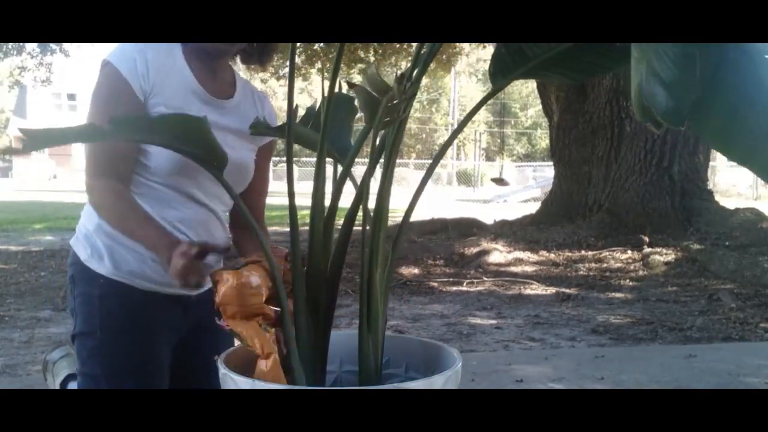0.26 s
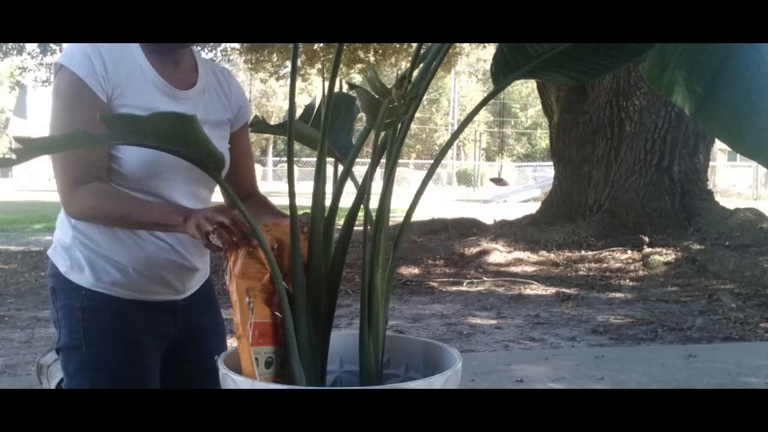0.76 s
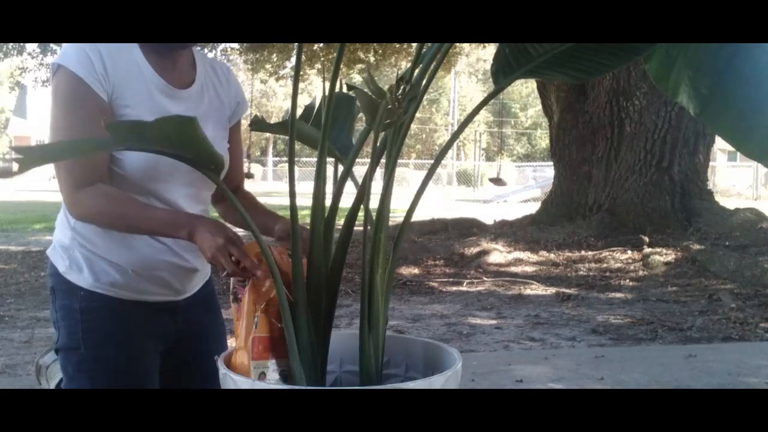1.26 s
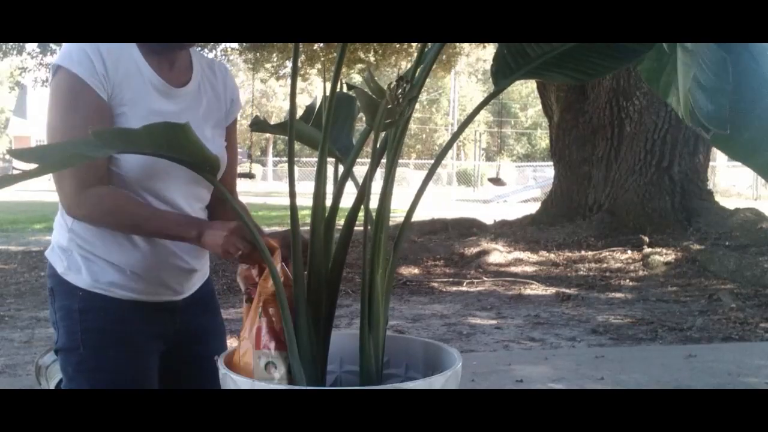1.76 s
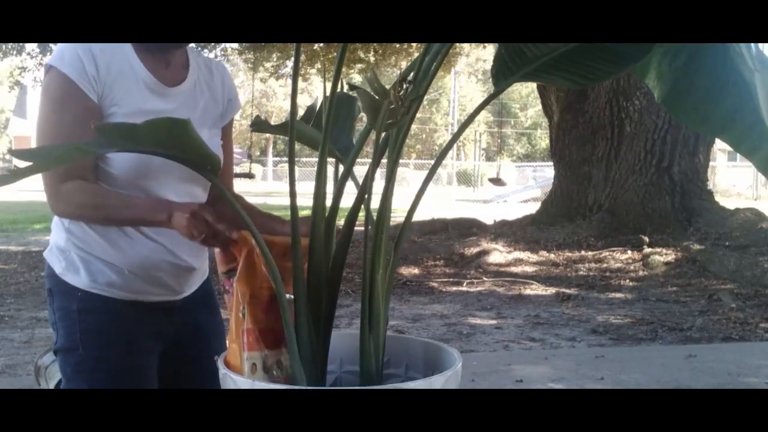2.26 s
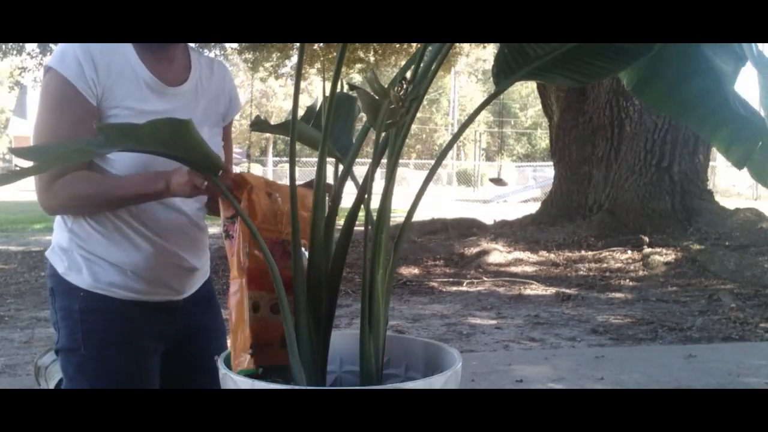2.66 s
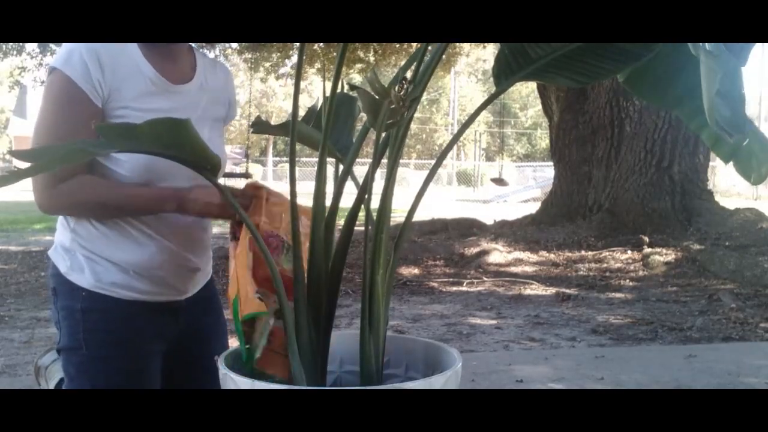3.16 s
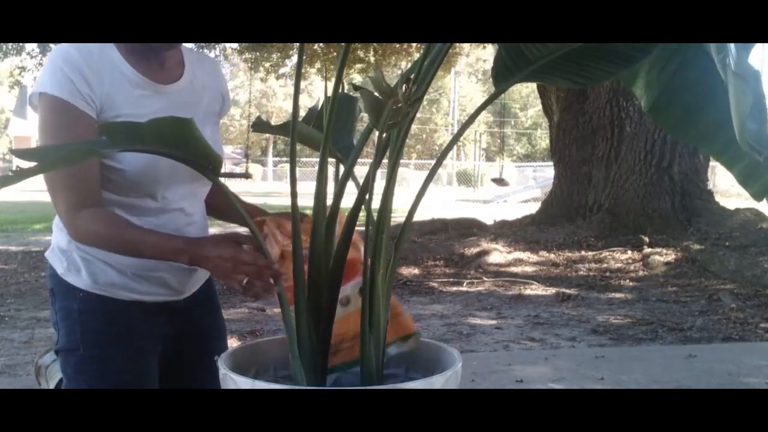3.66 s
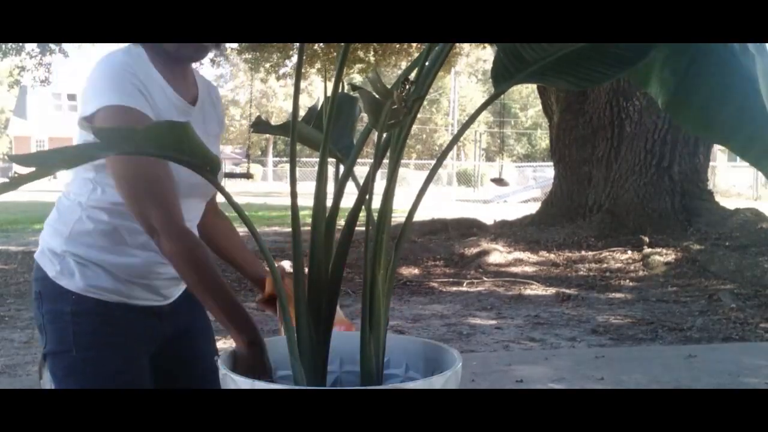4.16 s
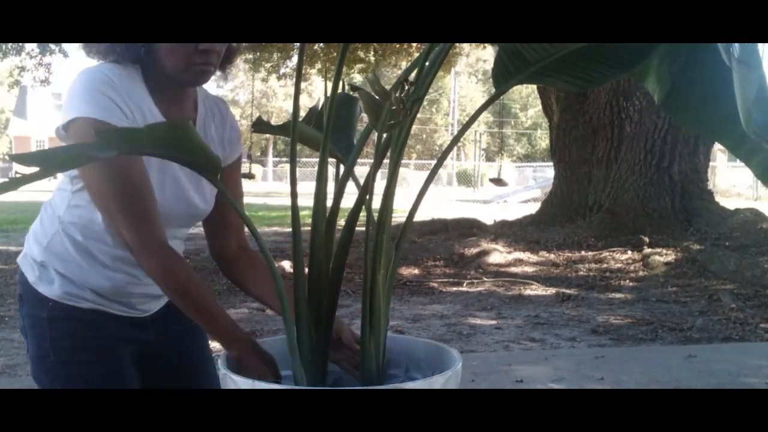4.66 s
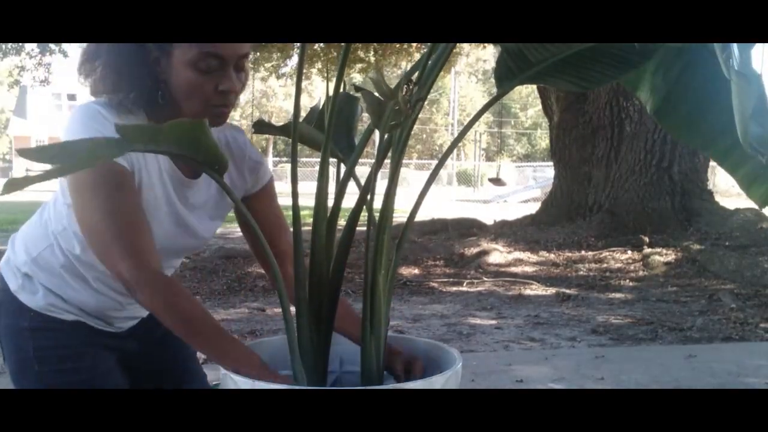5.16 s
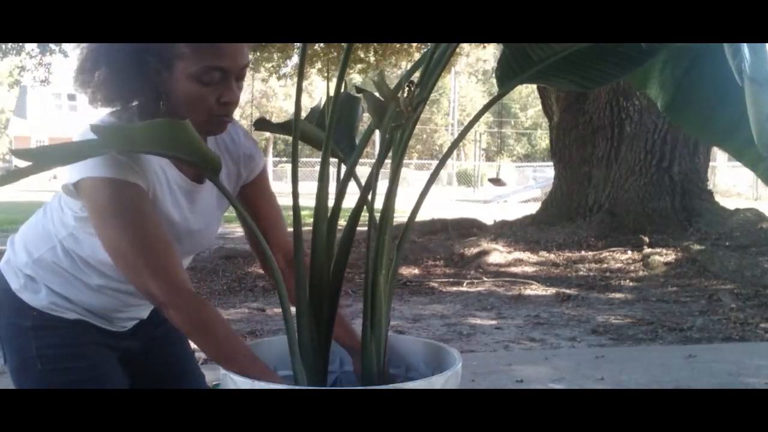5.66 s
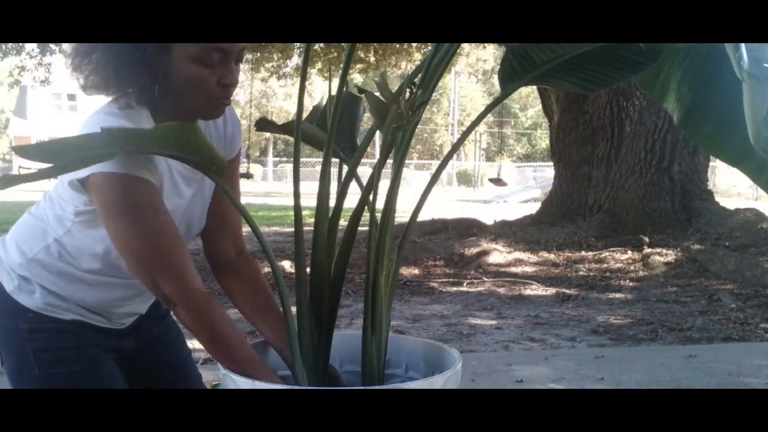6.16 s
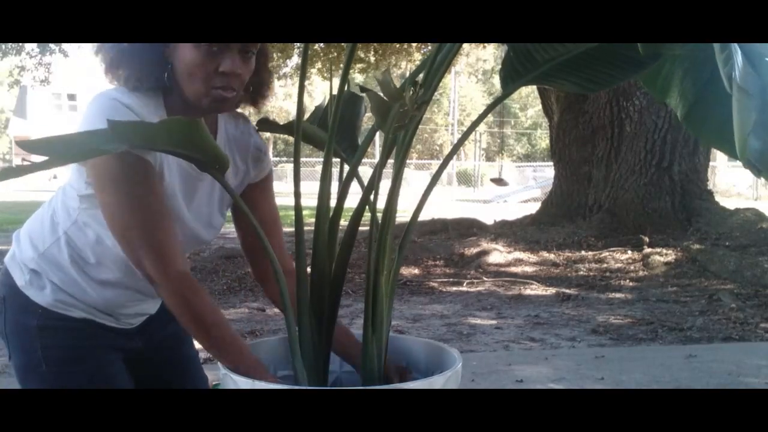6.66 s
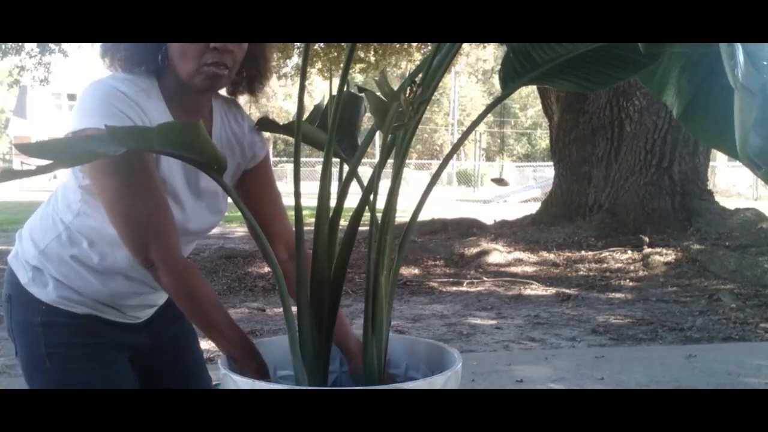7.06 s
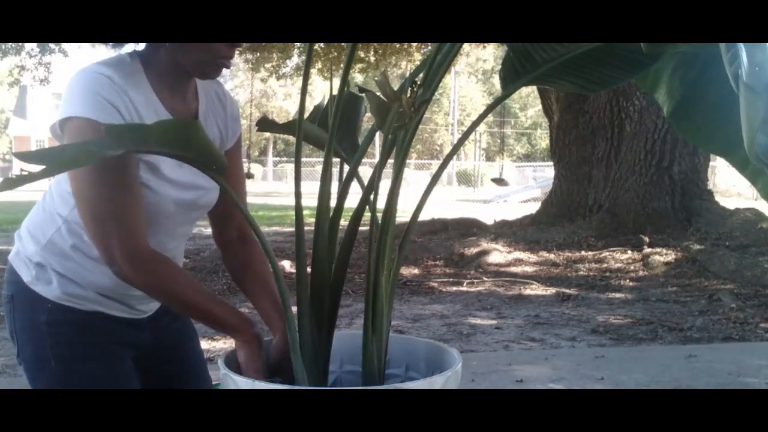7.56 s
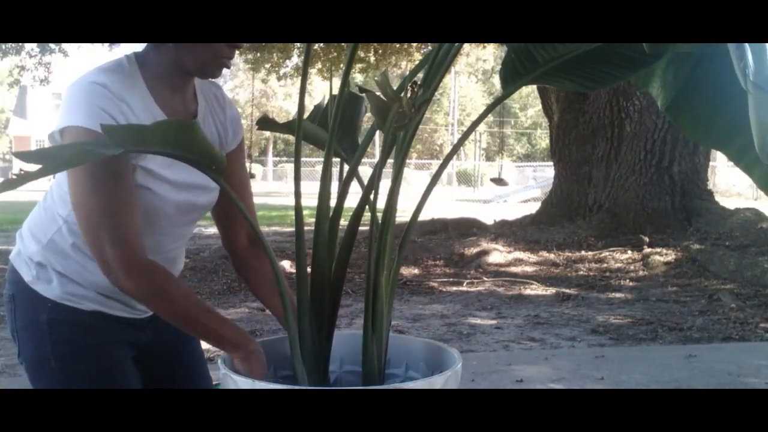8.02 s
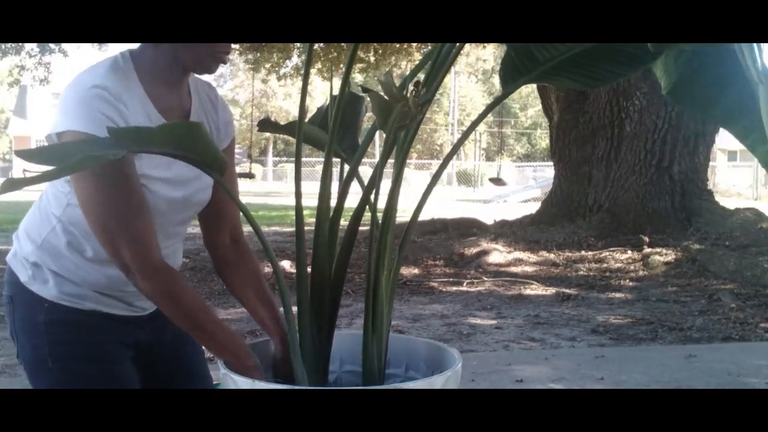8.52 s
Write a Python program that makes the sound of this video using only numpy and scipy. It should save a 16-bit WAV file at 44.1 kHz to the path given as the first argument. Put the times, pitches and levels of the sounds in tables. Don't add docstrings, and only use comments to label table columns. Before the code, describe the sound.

Close outdoors, a stiff plastic bag crinkles and snaps sharply as it is gathered and shaken, loudest around two seconds, with soil sliding and clods thudding on a planter. It flaps empty, falls with a last crackle and a hard thump. Then only faint gritty ticks of hands in soil remain over low traffic hum and wind buffeting the stereo microphone.

```python
import sys
import numpy as np
from scipy import signal
from scipy.fft import rfft, irfft
from scipy.io import wavfile
from scipy.ndimage import uniform_filter1d

SR = 44100
rng = np.random.default_rng(int(sys.argv[2]) if len(sys.argv) > 2 else 0)


def wrap_up_sound(samples):
    columns = np.atleast_2d(samples).T
    tamed = np.clip(columns, -1, 1)
    steps = np.round(tamed * 32767).astype(np.int16)
    wavfile.write(sys.argv[1], SR, steps)


def gain_from_decibels(decibels):
    exponent = np.asarray(decibels, float) / 20
    return 10 ** exponent


N = 387638


def evened(x):
    return x / np.sqrt(np.mean(x ** 2) + 1e-20)


def read(points, hz):
    f, value = np.transpose(points)
    return np.interp(np.log(hz + 1), np.log(f + 1), value)


def add(mix, s, sound):
    part = mix[..., max(round(s * SR), 0):][..., :sound.shape[-1]]
    part += sound[..., :part.shape[-1]]


def causal(gain_db):
    cepstrum = irfft(np.maximum(gain_db, -100) * np.log(10) / 20)
    cepstrum[1:2048] *= 2
    cepstrum[2049:] = 0
    return irfft(np.exp(rfft(cepstrum)))[:2048]


def resonate(x, hz, width):
    return signal.lfilter(*signal.iirpeak(hz, hz / width, SR), x)


def ring(x, hz, width):
    turn = np.exp(2j * np.pi * np.cumsum(hz) / SR)
    r = np.exp(-np.pi * width / SR)
    return 2 * (turn * signal.lfilter([1 - r], [1, -r], x / turn)).real


def noise(colour, same, swell_db, patchy_db, size=2048):
    frames, hz = 4 * N // size + 5, np.fft.rfftfreq(size, 1 / SR)
    a, b, c, d, patches = rng.standard_normal((frames, len(hz), 5)).T
    swell = evened(uniform_filter1d(patches[0], size=12))
    patches = uniform_filter1d(patches, size=8, axis=0)
    patches = evened(uniform_filter1d(patches, size=8, axis=1))
    same = np.clip(same(hz), -1, 1)[:, None]
    left = a + 1j * b
    right = same * left + np.sqrt(1 - same ** 2) * (c + 1j * d)
    drift_db = (patchy_db * patches + swell_db * swell) / (1 + hz[:, None] / 2500)
    z = np.array([left, right]) * gain_from_decibels(read(colour, hz)[:, None] + drift_db)
    return evened(signal.istft(z, nperseg=size, noverlap=3 * size // 4)[1][:, :N])


def yard():
    # pitch in Hz, level in dB per Hz.
    hum_colour = [(26, -42.5), (45, 0), (85, -12.5), (114, -3), (162, -6), (245, -16.5), (271, -21),
                  (442, -26.5), (838, -32), (948, -34.5), (1050, -38.5), (1440, -49.5), (4920, -64),
                  (7650, -69), (16000, -100.5)]
    # pitch in Hz, likeness of left and right from -1 to 1.
    hum_likeness = [(60, 0.93), (180, 0.94), (550, 0.55), (1650, -0.32), (4970, 0.16), (15000, -0.928)]
    # pitch in Hz, width in Hz.
    machine_lines = [(67.8, 16), (1030, 40), (1980, 40), (2080, 210), (5700, 200), (7620, 260)]
    machine_levels = [-41.5, -70.5, -85.5, -82, -94.5, -97.5]
    out = gain_from_decibels(-34.5) * noise(hum_colour, lambda hz: read(hum_likeness, hz), swell_db=2.0, patchy_db=0.5)
    hiss = rng.standard_normal(N)
    for (hz, width), db in zip(machine_lines, machine_levels):
        line = resonate(resonate(hiss, hz, width), hz, width)
        out = out + gain_from_decibels(db) * evened(line)
    return out


def wind():
    # time in seconds, level in dB.
    gust_curve = [(0.0, -63), (0.12, -37), (0.78, -51.5), (3.06, -39.5), (3.67, -26.5), (3.771, -34),
                  (4.8, -34.5), (4.819, -35.5), (5.24, -29), (5.29, -37), (6.0, -31), (6.76, -39),
                  (7.44, -30), (7.54, -46.5), (8.22, -35.5), (8.32, -53), (8.54, -35), (8.79, -63.5)]
    # pitch in Hz, level in dB per Hz.
    gust_colour = [(8, -10.5), (20, 11), (45, 9.5), (90, -13.5), (200, -15), (500, -81.5)]
    s, db = np.transpose(gust_curve)
    gusts = noise(gust_colour, lambda hz: 0.05 + 0 * hz, swell_db=2.5, patchy_db=3.0)
    gusts /= np.sqrt(uniform_filter1d(gusts ** 2, size=16000, axis=1))
    return gusts * gain_from_decibels(np.interp(np.arange(N) / SR, s, db) + 3.5) * gain_from_decibels([[-1.5], [1.5]])


def rustle_levels(t):
    # time in seconds, level in dB.
    shaking = [(0.0, -52), (0.62, -45), (0.89, -45.5), (1.07, -38), (1.2, -44.5), (1.45, -37.5),
               (1.59, -44.5), (1.76, -36.5), (2.0, -51), (2.03, -44.5), (2.24, -47), (2.53, -36),
               (2.6, -47), (2.81, -47.5), (2.99, -40.5), (3.15, -48), (3.31, -41.5), (3.42, -51.5)]
    # time in seconds, level in dB.
    falling = [(3.54, -42.5), (3.67, -36), (3.72, -41.5), (3.77, -36.5), (3.8, -45), (3.82, -33.5),
               (3.86, -42.5), (3.93, -50.5), (3.96, -81)]
    # time in seconds, level in dB.
    settling = [(4.05, -80), (4.21, -77), (4.24, -55), (4.35, -50), (4.38, -34.5), (4.42, -64), (4.49, -61),
                (4.53, -85), (4.72, -74.5)]
    # middle in seconds,
    # length in seconds, level in dB, bright share in dB, boomy share in dB.
    slides = [(0.951, 0.13, -36.5, -8, 1), (1.663, 0.041, -34.5, -12, 0), (1.879, 0.11, -36, -13, -0.5),
              (1.966, 0.12, -31.5, -11, 0.5), (2.099, 0.068, -29, -10, 4), (2.165, 0.2, -32.5, -8, -3),
              (2.287, 0.038, -24, -23, -4.5), (2.342, 0.24, -39, -9.5, 1.5), (2.915, 0.046, -48, -27, -2),
              (3.26, 0.1, -50, -25, 11), (3.342, 0.02, -39.5, -18, 13), (3.74, 0.063, -41, -4, 1),
              (4.108, 0.16, -75, -7, -4), (5.415, 0.029, -74, 0, -3), (5.887, 0.029, -59.5, -18.5, 17),
              (6.25, 0.075, -56, -2.5, 7.5), (6.348, 0.04, -73.5, -26.5, 27.5),
              (7.975, 0.016, -62.5, -12, 9), (8.473, 0.049, -65.5, -18.5, 17), (4.436, 0.16, -48.5, -7, 9),
              (4.567, 0.039, -62.5, -10.5, 8), (4.765, 0.054, -70.5, -17.5, 19),
              (4.652, 0.046, -68.5, -14.5, 18)]
    s, db = np.transpose(list(shaking) + list(falling) + list(settling))
    effort_db = np.interp(t, s, db, right=-130)
    strong_db = np.maximum(effort_db + 40.5, -5)
    boomy = -1.5 - 0.16 * strong_db
    bright = -8 - t - 0.63 * strong_db
    levels = gain_from_decibels(effort_db + np.array([boomy, 0 * t, bright]))
    for s, length, db, bright_db, boomy_db in slides:
        swell = np.hanning(round(length * SR))
        add(levels, s - length / 2, gain_from_decibels(db + np.array([[boomy_db], [0], [bright_db]])) * swell)
    return levels


def folds():
    # start in seconds, peak in dB, bright share in dB, time to fade by 60 dB in seconds.
    gathering = [(0.1268, -24, -6, 0.025), (0.1396, -17, -8, 0.026), (0.184, -20.5, -16, 0.022),
                 (0.2426, -22, -14, 0.034), (0.2633, -20, -16, 0.024), (0.3198, -25, -7, 0.06),
                 (0.4112, -25.5, 2.5, 0.052), (0.4217, -23.5, -20, 0.066), (0.5256, -14.5, -5, 0.022),
                 (0.5895, -19.5, -12.5, 0.043), (0.618, -42, 9, 0.014), (0.6953, -24.5, -28, 0.048),
                 (0.753, -26, -20, 0.038), (0.861, -25, -20, 0.15), (0.9043, -38, -10, 0.02),
                 (0.922, -18, -20, 0.021), (0.945, -16.5, -15, 0.039), (0.9774, -17, -11, 0.07),
                 (0.9976, -21, -8, 0.028), (1.0644, -28, -8, 0.17), (1.1, -24, -9.5, 0.1),
                 (1.1724, -24.5, -12.5, 0.18), (1.1952, -19, -18, 0.078)]
    hard_shakes = [(1.371, -14, -14, 0.045), (1.3938, -16, -9, 0.032), (1.4294, -9.5, -25.5, 0.016),
                   (1.4407, -5, -10.5, 0.018), (1.4587, -17, -10.5, 0.1), (1.51, -24, -2, 0.0082),
                   (1.54, -15.5, -13, 0.02), (1.579, -18, -21, 0.084), (1.641, -33, -19, 0.044),
                   (1.6653, -19.5, -22, 0.095), (1.7205, -8.5, -13, 0.017), (1.7315, -8, -13.5, 0.04),
                   (1.744, -16.5, -14, 0.15), (1.7851, -20.5, -6.5, 0.038), (1.8774, -14, -19, 0.027),
                   (1.8845, -6, -17.5, 0.097), (1.9255, -17.5, -13, 0.21), (1.937, -19.5, -3, 0.038),
                   (1.989, -19, -12.5, 0.06), (2.0777, -8, -18.5, 0.029), (2.0929, -4.5, -13.5, 0.07),
                   (2.147, -4, -13, 0.033), (2.2202, -11, -10.5, 0.021), (2.254, -18, -9, 0.055),
                   (2.2905, -6.5, -12, 0.071), (2.2935, -26, -1, 0.03), (2.378, -24.5, -4, 0.034),
                   (2.397, -11.5, -11.5, 0.038), (2.4217, -17.5, -20.5, 0.031), (2.5032, -15, -21, 0.17),
                   (2.5235, -8, -14.5, 0.03)]
    empty_flaps = [(2.7724, -26.5, -25, 0.1), (2.798, -19, -23, 0.069), (2.866, -26.5, -12, 0.015),
                   (2.8982, -26, -10.5, 0.034), (2.9264, -26, -33, 0.15), (3.0924, -23.5, -34, 0.055),
                   (3.1365, -18, -19, 0.2), (3.1432, -17, -15, 0.019), (3.1688, -18, -15.5, 0.062),
                   (3.235, -19.5, -28, 0.066), (3.2574, -26, -18, 0.19), (3.3088, -30, -26, 0.046),
                   (3.3414, -31.5, -20, 0.061), (3.462, -24, -16, 0.015), (3.49, -14.5, -17, 0.023),
                   (3.5306, -21.5, -17, 0.091), (3.5728, -27, -8, 0.04), (3.5866, -8.5, -16, 0.026),
                   (3.6295, -29.5, 2, 0.12), (3.6614, -29, -7, 0.056), (3.7243, -22, -15, 0.03),
                   (3.7405, -8, -13.5, 0.046), (3.817, -15.5, -14.5, 0.029), (3.9962, -37.5, -15, 0.035),
                   (4.3545, -21, -20, 0.12), (4.3652, -26, -10, 0.044)]
    # start in seconds, peak in dB,
    # bright share in dB, boomy share in dB.
    crumbs = [(3.9627, -42.5, -13, 1), (4.085, -40.5, -20, 0), (4.12, -34, -21, 4), (4.1344, -48, -8.5, 5),
              (4.555, -48, -16, -2), (4.578, -55, -13, 11.5), (4.622, -48, -11, 3),
              (4.658, -50, -22.5, 16.5), (4.76, -54, -25, 10), (4.7724, -61, -18, 5.5),
              (5.385, -60.5, -2, 6.5), (5.4182, -55.5, -5.5, 2), (5.613, -63.5, 2, 7),
              (5.789, -53.5, -16.5, 16), (5.878, -40, -27, 2), (5.8956, -52, -17, -3),
              (5.9446, -61, -9, 11), (6.0432, -65.5, -4, 3), (6.222, -57.5, -9, 8),
              (6.243, -53.5, -12.5, 9.5), (6.6746, -59.5, -12, 10), (7.215, -53, -8, -2.5),
              (7.2337, -61, -8, 5.5), (7.9535, -53.5, -22.5, 11.5), (7.9693, -43, -20.5, -0.5),
              (8.3195, -56, -22, 12), (8.4643, -46.5, -22, -0.5), (8.475, -57, -19.5, 6.5),
              (8.655, -59.5, -2, 0), (8.672, -65, 0.5, -0.5)]
    # start in seconds, peak in dB, bright and boomy shares in dB.
    ticks = [(0.052, -29, -9, -13), (0.064, -30, -13, -15), (0.2183, -27.5, -10.5, -12),
             (0.277, -31, -25, 6), (0.4664, -28, -4.5, -10), (0.7127, -31.5, -10, 2),
             (1.406, -26, -8, -17.5), (1.477, -21, -10, -6), (1.748, -23, -14.5, -12),
             (1.896, -10.5, -21, -3.5), (2.0488, -38, -18, -8), (2.064, -20.5, -19, -4),
             (2.107, -3.5, -13.5, -8), (2.1983, -17, -7, -20), (2.279, -15, -25, -14), (2.299, 0, -26, -15),
             (2.432, -27, -10, -14), (2.651, -36, -10, -6), (2.725, -47, -14, -6), (2.844, -32, -4, -9),
             (3.031, -29, -22, 0.5), (3.127, -26, -25, 5), (3.425, -30, -20, -6), (3.446, -26, -20, -3),
             (3.522, -36, -12, 3), (3.559, -30, 0, -12), (3.751, -30, -19, -29), (3.83, -23, -14, -2),
             (3.9151, -31, -8, 1), (3.93, -42, -11, -12), (4.056, -56, -13, -2), (4.2421, -53, -26, -6),
             (4.2531, -39, -24, -2), (4.3238, -39, -21, 8), (4.378, -29, -8, -8), (4.4102, -28.5, -9, 3),
             (4.431, -42, -14, 5), (4.475, -44, -11, -2), (4.505, -50.5, -22, 18), (4.5634, -54.5, -3, 0),
             (5.418, -55.5, -6, -2.5), (5.6134, -62, -6, -3.5), (6.6747, -61.5, -6.5, 1),
             (7.217, -60.5, -10, -5), (7.9686, -52.5, -17, 0), (8.4667, -47.5, -17.5, 2.5),
             (0.668, -39, -8, -8), (1.086, -24, -11, -5), (3.247, -25, -18, 7), (3.699, -30, -8, -5)]
    s, db, bright_db, t60 = np.transpose(list(gathering) + list(hard_shakes) + list(empty_flaps))
    t60 = np.clip(t60, .008, .15)
    chance = rng.random(len(s))
    boomy_db = -13 + 12 * np.log2(t60 / 0.081) - 2.5 * (db + 16.0)
    boomy_db = np.minimum(boomy_db, -6)
    ring_hz = 1000 * 2 ** (1.9 * chance ** 2)
    bag = np.transpose([s, db, bright_db, boomy_db, t60, ring_hz, np.ones(len(s))])
    soil = [(*row, 0.031, 1750, .15) for row in crumbs]
    small = [(*row, 0.021, 2400, 1) for row in ticks]
    rows = np.vstack([bag, np.array(soil + small)])
    return rows[np.argsort(rows[:, 0])]


def buckles(per_s, clump_db, starts, count=10):
    size = gain_from_decibels(.6 * np.minimum(rng.exponential(1, N), 4.5)) * rng.choice([-1, 1], N)
    clumps = gain_from_decibels(clump_db * evened(uniform_filter1d(rng.standard_normal(N), size=300)))
    size = evened(size * (rng.random(N) < clumps * per_s / SR))
    size[(starts * SR).astype(int)] = 8
    patch, out = rng.integers(0, count, N), np.zeros((2, N))
    for k, (pitch, side) in enumerate(rng.random((count, 2))):
        clicks = size * (patch == k)
        clicks = clicks + 0.04 * resonate(clicks, 1400 * 4.5 ** pitch, 700 * 2.5 ** pitch)
        left = np.roll(clicks, 1 + 3 * k // 4) * gain_from_decibels(2.3 * (side - 1.0))
        out += [left, clicks]
    return evened(out)


def crinkles(count=8):
    size = gain_from_decibels(2.4 * np.minimum(rng.exponential(1, N), 3))
    size = size * (rng.random(N) < 600 / SR)
    crease, t, out = rng.integers(0, count, N), np.arange(600) / SR, np.zeros((2, N))
    for k, (pitch, cycles, side) in enumerate(rng.random((count, 3))):
        hz = 950 * 10 ** ((k + pitch) / count)
        pop = np.sin(2 * np.pi * hz * t) * np.exp(-hz * t / (.5 + .9 * cycles))
        train = signal.oaconvolve(size * (crease == k), pop / np.linalg.norm(pop))[:N]
        out += [np.roll(train, 1 + k % 8) * gain_from_decibels(1.5 * side), train]
    return gain_from_decibels(-8) * evened(out)


def snap_power(snaps, t):
    power, u = np.zeros((3, N)), t[:4500]
    crack_db, crack_s = 8.5, 0.00046
    for s, db, bright_db, boomy_db, t60, _, crack in snaps:
        rise = 1 - np.exp(-u / (.012 * t60))
        burst = rise * gain_from_decibels(-120 * (u / np.clip(t60, .005, .15)) ** 1.223)
        sharp = abs(crack) * gain_from_decibels(2 * crack_db) * (0.02 / t60) ** 2
        burst = burst * (1 + sharp * np.exp(-2 * u / crack_s))
        share_db = np.array([[boomy_db + 5.5], [0], [bright_db + 5.0]])
        add(power, s + 0.0011, gain_from_decibels(2 * (db - 11.0 + share_db)) * burst)
    return power


def film():
    # pitch in Hz, level in dB per Hz.
    film_colour = [(180, -7.5), (300, -5), (425, -8), (930, 0), (1210, -2.5), (1530, 0), (2300, -1),
                   (3600, -2), (4990, -6), (7690, -13), (8940, -18.5), (10600, -19.5), (12100, -27),
                   (16000, -35)]
    t, snaps = np.arange(N) / SR, folds()
    rustle = rustle_levels(t)
    power = snap_power(snaps, t)
    loose = buckles(2600, 4.2, snaps[:0, 0])
    tight = buckles(6500, 3.325, snaps[snaps[:, 6] == 1, 0] + 0.00038)
    loose = loose + crinkles()
    latest = np.maximum(np.searchsorted(snaps[:, 0], t + .001) - 1, 0)
    ringing = evened(tight + 0.12 * ring(tight, snaps[latest, 5], 960))
    hz = np.fft.rfftfreq(4096, 1 / SR) + 1
    above_low, above_high = (1 / (1 + (edge / hz) ** 4) for edge in (820, 4500))
    shares = (1 - above_low, above_low - above_high, above_high)
    out = 0
    for snap, share, bed, level in zip((tight, ringing, tight), shares, rustle, np.sqrt(power)):
        colour = causal(read(film_colour, hz) + 20 * np.log10(share + 1e-9))
        colour = colour[None] / np.linalg.norm(colour)
        drive = loose * bed + snap * level
        out = out + signal.oaconvolve(drive, colour, axes=1)[:, :N]
    return out


def patchy(x):
    z = signal.stft(x, nperseg=256)[2]
    patches = rng.standard_normal(z.shape[:0:-1]).T
    patches = uniform_filter1d(patches, size=4, axis=0)
    patches = evened(uniform_filter1d(patches, size=12, axis=1))
    return signal.istft(z * gain_from_decibels(2.5 * patches), nperseg=256)[1][:, :N]


def pops():
    # start in seconds, peak in dB, pitch in Hz.
    creases = [(0.127, -25, 3010), (0.413, -9, 1740), (0.901, -21, 1610), (1.279, -31, 1880),
               (1.3568, -17, 1020), (1.4313, -16, 1760), (1.4414, -22, 2020), (1.5808, -28, 2250),
               (1.6636, -21.5, 990), (1.665, -24, 1620), (1.7015, -21, 1630), (1.732, -11, 1670),
               (1.787, -19, 1490), (1.884, -11.5, 994), (1.892, -11.5, 1516), (1.928, -18, 4510),
               (1.9378, -15, 1480), (2.081, -16, 1590), (2.0934, -9, 1040), (2.106, -18, 1540),
               (2.147, -22, 1560), (2.1649, -16, 2570), (2.2218, -22, 3320), (2.2897, -12, 1700),
               (2.3004, -8, 1785), (2.3955, -25, 1030), (2.4604, -30, 1640), (2.5112, -14, 1390),
               (2.6772, -27, 1490), (2.8184, -30, 1030), (2.9924, -34, 1330), (3.1446, -24, 1750),
               (3.1702, -31, 1360), (3.3404, -30, 1040), (3.7409, -25, 3700), (3.7514, -34, 1800),
               (3.8182, -31, 1700), (4.3595, -24, 1130)]
    # start in seconds, peak in dB, pitch in Hz.
    grains = [(5.4186, -48, 1550), (5.8796, -44, 1810), (6.6747, -55, 1750), (7.9534, -51.5, 2000),
              (7.9694, -48, 1660), (7.978, -49.5, 1630), (8.4652, -49.5, 1690), (8.4734, -54, 1600)]
    events = list(creases) + list(grains)
    right, t = np.zeros(N), np.arange(900) / SR
    for (s, db, hz), grit in zip(events, rng.standard_normal((len(events), 900))):
        grit = (grit + 3 * (t == 0)) * np.exp(-t / .002)
        pop = resonate(grit, hz, .8 * hz) + gain_from_decibels(-8) * uniform_filter1d(grit, size=3)
        add(right, s, gain_from_decibels(db - 5) * pop / abs(pop).max())
    return np.array([np.roll(right, 4), right])


def thuds():
    # start in seconds, peak in dB, pitch in Hz, time to
    # fade by 60 dB in seconds.
    hits = [
        (1.729, -20.5, 182, 0.014),
        (1.888, -22.5, 234, 0.043),
        (2.087, -24.5, 228, 0.036),
        (2.3, -11.5, 145.3, 0.031),
        (2.515, -38, 166, 0.17),
        (3.242, -33.5, 224, 0.045),
        (4.37, -46, 156, 0.013),
        (4.644, -24, 164.6, 0.014),
        (4.738, -6.5, 139, 0.019),
    ]
    out, t = np.zeros(N), np.arange(3000) / SR
    edge = 1 - np.exp(-(t / .0013) ** 2.5)
    sag = .22 * (1 - np.exp(-t / .0012))
    for s, db, hz, t60 in hits:
        swing = np.sin(2 * np.pi * (hz * t + sag)) * edge
        add(out, s - .0012, -gain_from_decibels(db + 9.0 - 60 * t / t60) * swing)
    first = gain_from_decibels(-14) * np.roll(out, round(.0085 * SR))
    second = gain_from_decibels(-13) * np.roll(out, round(.0125 * SR))
    return out + first + second


def shoves():
    # time in seconds, length in seconds, level in dB, left over right in dB.
    hard_gusts = [
        (3.267, .03, -23, -9),
        (5.179, 0.043, -24.5, -6),
        (5.401, 0.023, -27.5, -2.5),
        (5.937, 0.036, -22, -0.5),
        (5.973, 0.015, -17, -9.5),
        (6.131, 0.017, -23.5, 5),
        (6.6, 0.026, -23, 1.5),
        (8.291, 0.017, -29, 4),
    ]
    out = np.zeros((2, N))
    for s, length, db, pan_db in hard_gusts:
        u = np.arange(-1.5 * length, 1.5 * length, 1 / SR) / length * 4
        swing = (1 - u ** 2) * np.exp(-u ** 2 / 2)
        add(out, s - 1.54 * length, gain_from_decibels(db + pan_db * np.array([[.5], [-.5]])) * swing)
    return out


def nearby(x):
    taps = np.zeros((2, 4000))
    at = np.arange(40, 3960, 20) + rng.integers(0, 20, (2, 196))
    np.put_along_axis(taps, at, rng.choice([-1., 1.], at.shape), 1)
    taps *= gain_from_decibels(-60 * np.arange(4000) / SR / 0.11)
    return x + gain_from_decibels(-9.0) * signal.oaconvolve(x, taps / np.linalg.norm(taps[0]), axes=1)[:, :N]


def scene():
    bag = patchy(film()) + thuds()
    far = yard() + wind() + shoves()
    return nearby(bag + pops()) + far


def top_cut(x):
    return signal.sosfilt(signal.butter(12, 16480, fs=SR, output="sos"), x)


def record(dry):
    # pitch in Hz, width in Hz, level in dB.
    cavities = [
        [(7670, 950, 10), (10224, 900, -29), (5526, 4200, -21.5)],
        [(7500, 740, -25.5), (10410, 1100, 8), (13600, 1100, -3)],
    ]
    noisy = dry + gain_from_decibels(-83.5) * rng.standard_normal(dry.shape)
    ports = []
    for x, peaks in zip(noisy, cavities):
        ports.append(x + sum(gain_from_decibels(db) * resonate(x, hz, width) for hz, width, db in peaks))
    air = gain_from_decibels(-82.5) * np.diff(rng.standard_normal(dry.shape), prepend=0)
    edge = signal.firwin(255, 15900, fs=SR)
    return top_cut(signal.oaconvolve(ports + air, edge[None], "same"))


dry = scene()
out = record(dry)
wrap_up_sound(out)
```